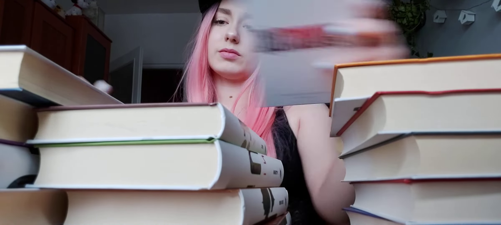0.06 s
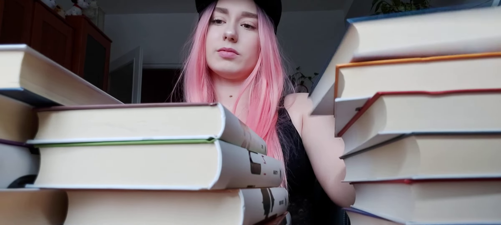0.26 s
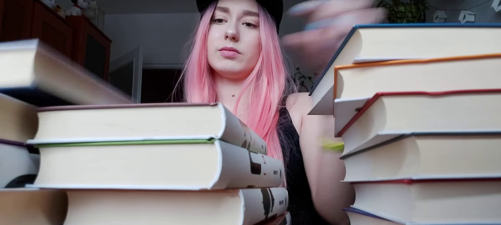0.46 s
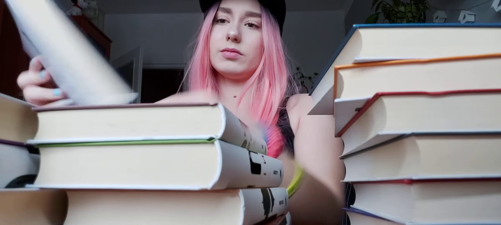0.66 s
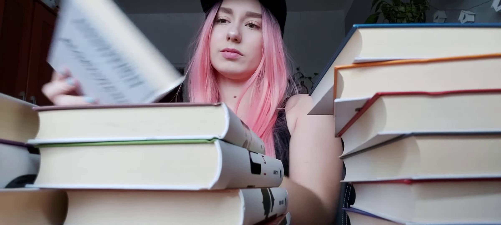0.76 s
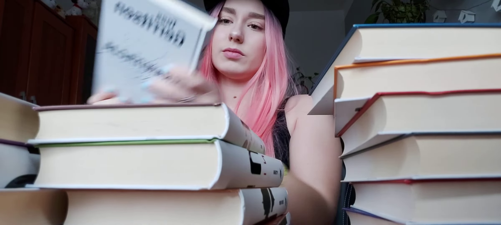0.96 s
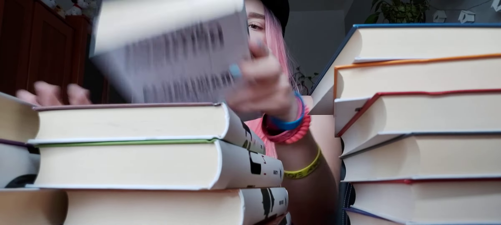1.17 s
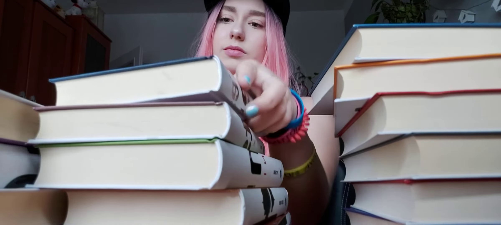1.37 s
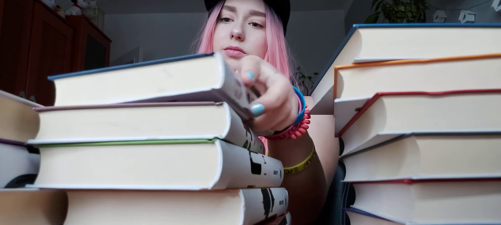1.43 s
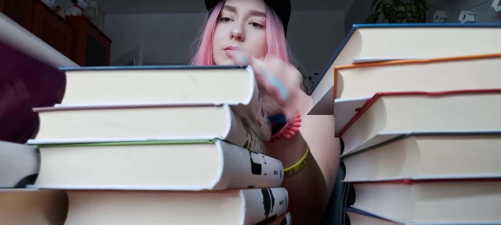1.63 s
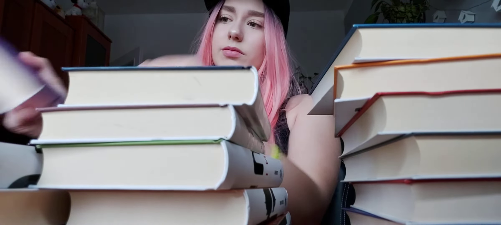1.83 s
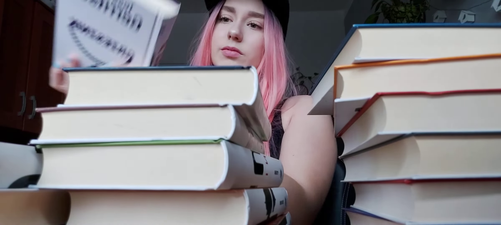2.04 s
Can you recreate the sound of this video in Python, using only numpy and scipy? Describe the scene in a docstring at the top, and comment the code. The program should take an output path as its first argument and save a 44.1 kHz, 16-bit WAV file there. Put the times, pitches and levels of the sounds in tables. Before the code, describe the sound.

Hardcover books thump heavily onto a stack, with cover scrapes and light taps between, close up

```python
"""A faint steady floor lies under the hiss of covers sliding on covers, as friction noise shaped by stroke speed.
A hardcover book taps a stack edge first, then drops flat: damped table modes boom under a clap of squeezed air,
with bursts of noise for pages, boards and edges. Then a book is drawn off its pile and knocked lightly in the hand,
as a few soft modes. A second book taps, slides and drops flat in turn, and a last few light contacts follow.
All is heard close to the microphone, with the diffuse decaying tail of a small room."""
import sys
import numpy as np
from scipy import signal
from scipy.fft import rfft, irfft
from scipy.io import wavfile

SR = 44100
rng = np.random.default_rng(int(sys.argv[2]) if len(sys.argv) > 2 else 0)


def to_wav(s):
    """Save 16-bit WAV."""
    ch = np.atleast_2d(s).T  # columns
    pcm = np.round(np.clip(ch, -1, 1) * 32767)  # PCM
    wavfile.write(sys.argv[1], SR, pcm.astype(np.int16))


N = 92610
TIME = np.arange(N) / SR   # s
HZ = np.maximum(np.arange(N // 2 + 1) * SR / N, 1)   # bin frequencies, kept above zero for the logarithm


def from_db(db):
    """Level to amplitude: 20 dB is a factor of ten."""
    return 10 ** (np.asarray(db) / 20)


def at_hz(points, hz):
    """Linear interpolation of a table on a logarithmic frequency axis."""
    f, value = np.transpose(points)
    return np.interp(np.log(hz), np.log(f), value)


def pan(left_over_right_db):
    """Stereo placing by level difference: half raises the left, half lowers the right."""
    return from_db(np.array([[left_over_right_db], [-left_over_right_db]]) / 2)


def noise(spectrum):
    """Partly correlated stereo noise: a shared mid and an opposed side, coloured by spectrum; rms 1."""
    # correlation of left and right: [f/Hz, correlation]
    likeness = [(60, 0.61), (250, 0.7), (500, 0.54), (1000, 0.033), (3000, .02), (14000, 0.011)]
    mid, side = rfft(rng.standard_normal((2, N)))
    alike = np.clip(at_hz(likeness, HZ), -1, 1)
    shared = np.sqrt(1 + alike) * mid
    opposed = np.sqrt(1 - alike) * side * [[1], [-1]]
    x = irfft(from_db(at_hz(spectrum, HZ)) * (shared + opposed), N)
    return x / x.std()


def since(s):
    """Elapsed time: seconds since a moment, zero before it."""
    return np.maximum(TIME - s, 0)


def dying(t, t60):
    """Exponential damping: the amplitude falls by 60 dB in t60 seconds."""
    return np.exp(-np.minimum(np.log(1000) * t / t60, 50))


def stretch(s):
    """Finite ring time: the samples kept after a blow at s (0.8 s at most), and the time since it."""
    start = int(s * SR)
    span = slice(start, min(start + int(0.8 * SR), N))
    return span, TIME[:span.stop - start]


def struck(modes, t, soft_s):
    """Modal superposition: damped sines of alternating sign, low-passed by a soft contact."""
    ringing = 0
    for k, (hz, db, t60) in enumerate(modes):
        ringing = ringing + (-1) ** k * from_db(db) * np.sin(2 * np.pi * hz * t) * dying(t, t60)
    r = np.exp(-1 / (soft_s * SR))   # one-pole smoothing with time constant soft_s
    return signal.lfilter([1 - r], [1, -r], ringing)


def burst(source, t, rise_s, t60):
    """High modal density: short-lived modes merge into noise that swells, then dies, equal on both sides."""
    envelope = (1 - np.exp(-(t / rise_s) ** 2)) * dying(t, t60)
    x = source * envelope
    decay_energy = np.sum(dying(t, t60) ** 2)
    return x * np.sqrt(decay_energy / np.sum(x ** 2, axis=1, keepdims=True))


def steady_floor():
    """Stationary noise: a faint background of constant level and colour."""
    # floor colour: [f/Hz, relative level/dB per Hz]
    floor_colour = [(25, -16), (58, 3), (90, 1.5), (180, -2), (330, -14.5), (600, -32.5), (1500, -16),
                    (4000, -19.5), (8000, -14), (12000, -14), (16000, -12.5)]
    return from_db(-69.5) * noise(floor_colour)


def slides():
    """Sliding friction: grainy noise swells and fades with the speed of each stroke."""
    # strokes of cover on cover: [fastest moment t/s, rise/s, fall/s, hiss level/dB, rasp level/dB, rub level/dB]
    strokes = [(0.059, .1, 0.052, -64, -72.5, -96), (0.255, 0.049, 0.17, -52.5, -41.5, -43),
               (0.594, 0.13, 0.094, -56, -58, -80), (0.644, 0.044, 0.044, -85, -55.5, -42.5),
               (0.829, 0.081, 0.13, -75.5, -91.5, -77.5), (1.032, 0.075, 0.11, -67.5, -82, -79.5),
               (1.135, 0.064, 0.065, -65.5, -71, -87.5), (1.316, 0.076, 0.11, -53, -51.5, -44),
               (1.556, 0.2, 0.041, -48.5, -65.5, -61), (1.595, 0.037, 0.051, -62, -58, -50),
               (1.698, 0.15, 0.11, -60, -55, -50), (1.841, 0.031, 0.037, -73, -103, -85),
               (2.014, .1, 0.095, -64, -88, -70)]
    # high hiss of the covers: [f/Hz, relative level/dB per Hz]
    hiss = [(500, -25.5), (1600, -21), (2400, -3), (3300, -9), (4400, -0.5), (7000, 2), (9000, -2),
            (12000, 3), (14000, -3.5), (16000, -6.5)]
    # coarser rasp: [f/Hz, relative level/dB per Hz]
    rasp = [(300, 10), (900, 0.5), (1600, -3), (2600, 5), (4500, -10), (7000, -19), (16000, -16)]
    # low rub: [f/Hz, relative level/dB per Hz]
    rub = [(40, -13), (90, -5), (170, 8.5), (300, -4.5), (600, -4.5), (1100, -12), (2000, -27.5),
           (6000, -60)]
    grain_db, grain_per_s = 2, 300   # spread of the random level, and its new values per second

    colours = [noise(hiss), noise(rasp), noise(rub)]
    grain_level = np.interp(TIME * grain_per_s, np.arange(N), rng.standard_normal(N))
    friction = 0
    for s, rise, fall, *levels in strokes:
        speed = np.sin(np.pi / 2 * np.interp(TIME, [s - rise, s, s + fall], [0, 1, 0])) ** 2
        stroke = sum(from_db(db) * colour for db, colour in zip(levels, colours))
        friction = friction + speed * stroke
    return pan(-1.5) * from_db(grain_db * grain_level) * friction


def air_clap(t, hz):
    """Air displacement: air squeezed out under a cover swings once up and once down in a bell-shaped envelope."""
    cycles = np.minimum(hz * t, 8)
    return np.sin(2 * np.pi * cycles) * np.exp(-2.6 * (cycles - 0.5) ** 2)   # 2.6: steepness of the bell


def blows():
    """Impact excitation: a blow booms the table, claps the air, thuds in pages, knocks boards, cracks edges."""
    # a book meets a stack: [t/s, push into the table/dB, contact/s, air clap level/dB, clap f/Hz,
    #   page thud level/dB, board knock level/dB, edge crack level/dB, crack f/Hz, left over right/dB]
    contacts = [(0.2020, -32, 0.00056, -65, 600, -32, -34, -45, 2400, -7),
                (0.2269, -29.5, 0.00084, -17.5, 840, -22.5, -16.5, -24, 2380, -4.5),
                (0.2378, -12, 0.0029, -21, 278, -40, -27, -30, 3198, -5.5),
                (0.2820, -19, 0.0027, -54, 396, -34.5, -27.5, -33.5, 2400, -4.5),
                (0.3416, -7.5, 0.0013, -2.5, 293.2, -16, -23, -24.5, 5365, -6),
                (0.3481, -17, 0.0023, -6.5, 257, -23, -31.5, -54, 4970, -1),
                (0.3513, -15, 0.00042, -33, 220, -14, -20, -29, 5975, 1),
                (0.371, -69, 0.00078, -33, 297.6, -39, -30, -32.5, 2632, -1.5),
                (0.75, -43.5, 0.0018, -49.5, 240, -54.5, -68, -62, 2177, -7),
                (1.256, -31.5, 0.001, -38.5, 800, -32, -35, -44.5, 6680, 0.5),
                (1.2872, -30, 0.00065, -17, 490, -27.5, -26, -26, 3840, 0),
                (1.296, -36, 0.0025, -20.5, 223, -38.5, -52, -38, 4054, -5),
                (1.3410, -23.5, 0.0019, -46, 300, -42, -52, -35.5, 7560, 0),
                (1.605, -20, .0008, -24.5, 516, -27.5, -32.5, -40.5, 2290, 11.5),
                (1.6072, -14, 0.00043, -7, 305.5, -19.5, -41, -41, 7000, -2.5),
                (1.6115, -25, 0.0012, -22, 208.4, -30, -47, -44, 3000, -5.5),
                (1.77, -62, 0.00037, -44, 826, -51, -46, -74, 1200, -5),
                (1.9150, -43, .0020, -54.5, 295.9, -56, -69, -82, 2500, -6),
                (1.934, -34.5, 0.0038, -63, 245, -46.5, -64, -86, 2510, -2)]
    # the table under its load of books: [f/Hz, relative level/dB, t60/s before settling and steadying]
    table_modes = [(50, -19, 0.083), (57.3, -20.5, 0.97), (69, 0.5, 0.12), (93.6, 2, 0.11),
                   (117.83, 0, 0.31), (162.8, -14, 0.041), (196, -15.5, 0.23), (270.7, -6, 0.15),
                   (291.3, -11, 0.3), (379, -15, 0.34), (445, -25.5, 0.19), (515, -23.5, 0.36),
                   (673, -34.5, 0.21)]
    # the block of pages thuds dully: [f/Hz, relative level/dB per Hz]
    page_colour = [(25, -27), (45, -7), (100, 1.5), (160, 0.5), (290, 0), (480, -14), (650, -12.5),
                   (900, -28), (2000, -49)]
    # the stiff boards of a cover: [f/Hz, relative level/dB per Hz]
    board_colour = [(100, -5.5), (260, 5), (500, -1.5), (1000, 3), (1300, -10.5), (2100, -6), (3500, -43.5),
                    (8000, -50), (16000, -59)]
    # the edges of the boards: [f/Hz, relative level/dB per Hz]
    edge_colour = [(300, -27), (1200, -7.5), (2200, 2.5), (4000, -0.5), (5500, -3), (7500, -7.5),
                   (12000, -7.5), (14000, -8), (16000, -21)]
    pages_t60_s, board_t60_s, edge_t60_s = 0.049, 0.028, 0.014
    edge_rise_s, crack_q, crack_peak_db = 0.0004, 7.7, 9.5
    settle_s = 0.36   # friction between the piled books stops the last of the table's ring
    steady_s, steady_db_per_s = 1.74, 94.5   # a hand steadies the stack and damps its earlier ring
    table_pan_db, edge_pan_db = -2.5, -1   # edges lie further right than the rest of the book

    pages, boards, edges = noise(page_colour), noise(board_colour), noise(edge_colour)
    out = np.zeros((2, N))
    for s, push_db, contact_s, clap_db, clap_hz, thud_db, board_db, edge_db, crack_hz, pan_db in contacts:
        span, t = stretch(s)
        damping_db = steady_db_per_s * since(steady_s)[span] * (s < steady_s)
        settling = np.exp(-(t / settle_s) ** 4)
        boom = from_db(push_db - damping_db) * struck(table_modes, t, contact_s) * settling

        resonance = signal.lfilter(*signal.iirpeak(crack_hz, crack_q, fs=SR), edges[:, span])
        edge = edges[:, span] + from_db(crack_peak_db) * resonance

        clap = from_db(clap_db) * air_clap(t, clap_hz)
        thud = from_db(thud_db) * burst(pages[:, span], t, 2 * contact_s, pages_t60_s)
        knock = from_db(board_db) * burst(boards[:, span], t, contact_s / 2, board_t60_s)
        crack = from_db(edge_db) * pan(edge_pan_db) * burst(edge, t, edge_rise_s, edge_t60_s)
        out[:, span] += pan(table_pan_db) * boom + pan(pan_db) * (clap + thud + knock + crack)
    return out


def hand_knock():
    """Modal response of a held book: a light knock gives a short hollow thud of modes and noise."""
    # modes of the held book: [f/Hz, relative level/dB, t60/s]
    held_modes = [(237, -6, 0.087), (301, -5, .15), (322.7, -6, 0.27), (370, -15.5, 0.21), (405, -18, 0.16)]
    # dense body sound around them: [f/Hz, relative level/dB per Hz]
    body_colour = [(30, -50.5), (120, -22.5), (180, -2.5), (270, -1), (400, 1), (520, -19), (1000, -26),
                   (1600, -41.5), (5000, -44)]
    knock_s, soft_s, rise_s, body_t60_s = 0.933, 0.00089, 0.0033, 0.15
    ring_db, body_db = -33, -44

    span, t = stretch(knock_s)
    ring = struck(held_modes, t, soft_s) * (1 - np.exp(-t / rise_s))
    body = burst(noise(body_colour)[:, span], t, rise_s, body_t60_s)
    out = np.zeros((2, N))
    out[:, span] = from_db(ring_db) * ring + from_db(body_db) * body
    return pan(-7.5) * out


def room(x):
    """Diffuse reverberation: convolution with noise that builds in milliseconds and dies octave by octave."""
    # reverberation time: [f/Hz, t60/s]
    room_t60 = [(60, 0.33), (200, 0.48), (500, 0.31), (1500, 0.38), (5000, 0.31), (14000, 0.083)]
    # strength of the tail: [f/Hz, level/dB]
    room_send = [(60, -25.5), (120, -8.5), (250, -12), (500, -14.5), (1500, -11.5), (5000, -6.5),
                 (14000, -20.5)]
    white = rfft(noise([(1, 0), (2, 0)]))   # flat colour
    build_up = 1 - dying(since(0.0017), t60=0.06)   # silent for the first 1.7 ms
    tail = 0
    for hz in 62.5 * 2.0 ** np.arange(9):
        octave = np.maximum(1 - abs(np.log2(HZ / hz)), 0)   # triangular band, overlapping its neighbours
        band = irfft(white * octave, N)
        envelope = dying(TIME, at_hz(room_t60, hz)) * build_up
        tail = tail + from_db(at_hz(room_send, hz)) * band * envelope / np.sqrt(np.sum(envelope ** 2))
    return signal.fftconvolve(x, tail, axes=1)[:, :N]


def scene():
    """Linear superposition: the books, their room and a faint steady floor."""
    books = slides() + blows() + hand_knock()
    return books + room(books) + steady_floor()


def record(dry):
    """Band limiting and saturation: deep bass is dropped, the highest peaks are rounded, the top is cut."""
    low_cut = signal.butter(4, 40, "high", fs=SR, output="sos")   # Hz
    x = signal.sosfilt(low_cut, dry)
    rounded = x / (1 + x ** 8) ** (1 / 8)
    top_cut = signal.ellip(10, 0.1, 80, 15700, fs=SR, output="sos")   # ripple dB, stopband dB, Hz
    return signal.sosfilt(top_cut, rounded)


dry = scene()
out = record(dry)
to_wav(out)
```